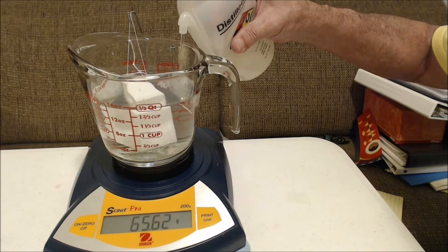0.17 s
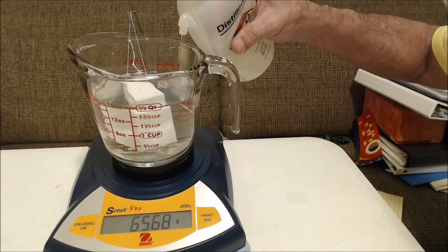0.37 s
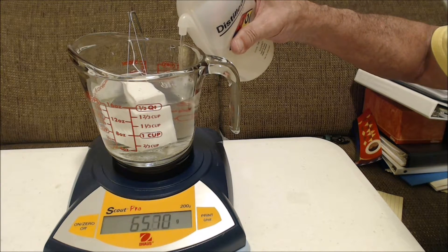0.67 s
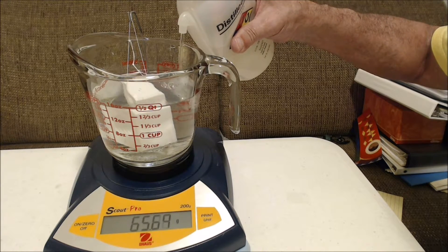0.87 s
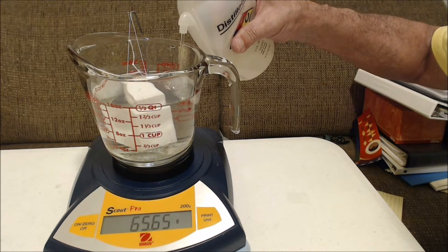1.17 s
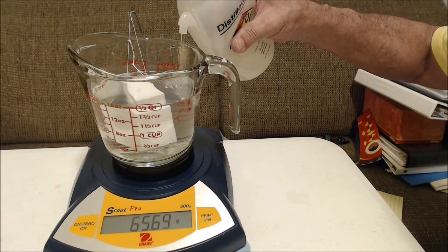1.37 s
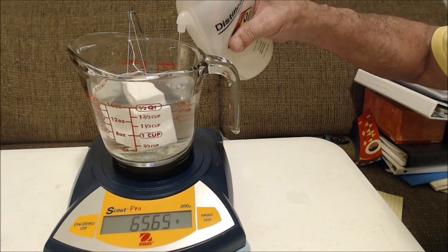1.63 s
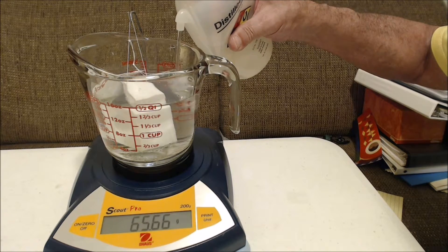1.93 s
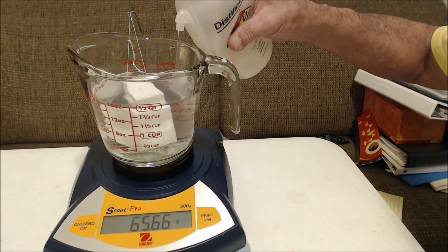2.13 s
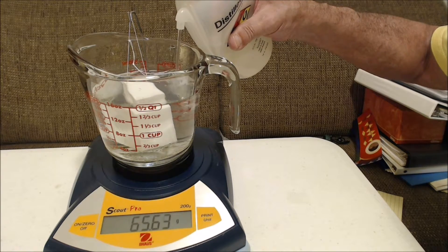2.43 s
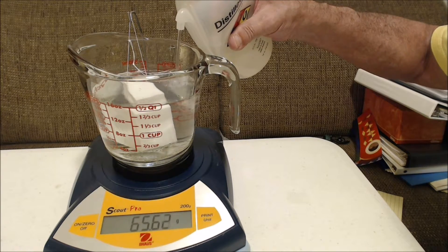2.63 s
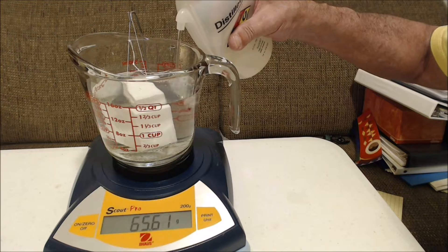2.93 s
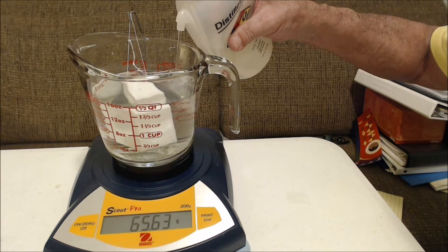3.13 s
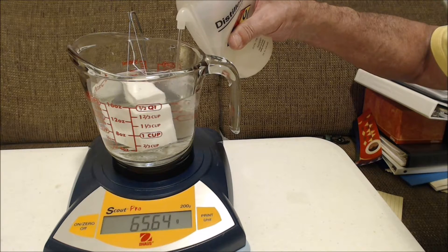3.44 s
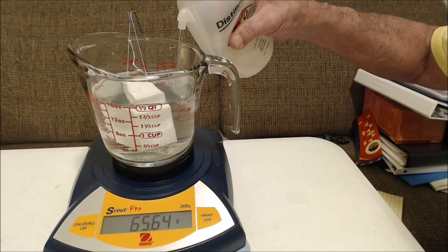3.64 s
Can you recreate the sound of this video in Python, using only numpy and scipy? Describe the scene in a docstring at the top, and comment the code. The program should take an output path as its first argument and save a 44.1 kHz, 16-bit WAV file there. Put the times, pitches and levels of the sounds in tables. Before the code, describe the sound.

Water trickles thinly from a jug into a partly filled glass cup, plopping and bubbling unevenly.

```python
"""Quiet room: a thin stream of water trickles from a jug into a partly filled glass cup.
Drops tick on the surface as impulses; trapped bubbles ring as short, dying, rising sines.
Band noise churns under them; resonances of the cup's air and glass colour all the water.
One soft low thud is a windowed cosine; the faint room hum is shaped noise.
"""
import sys
import numpy as np
from scipy import signal
from scipy.fft import rfft, irfft
from scipy.io import wavfile
from scipy.ndimage import uniform_filter1d

SR = 44100
rng = np.random.default_rng(int(sys.argv[2]) if len(sys.argv) > 2 else 0)


def file_out(sig):
    """Save sig as 16-bit WAV at sys.argv[1]."""
    # one column per channel
    cols = np.atleast_2d(sig).T
    # limit, then scale
    lim = np.clip(cols, -1, 1)
    pcm = np.round(lim * 32767).astype(np.int16)
    wavfile.write(sys.argv[1], SR, pcm)


N = 167580

# room hum spectrum, relative: freq_hz, density_db
HUM_SPECTRUM = [(25, -21.5), (70, -24.5), (100, -16), (125, 0.5), (150, -8), (195, 3.5), (260, -7),
                (400, -15), (700, -16), (2500, -23), (5000, -46), (8000, -58.5)]
# stream swells, one level per bubble size: start_s, hold_s, large_db, middle_db, fine_db
GUSHES = [(0.0, 0.0053, -43, -58, -57), (0.013, 0.15, -39.5, -49, -51), (0.296, 0.088, -54.5, -97, -64.5),
          (0.413, 0.19, -40.5, -54, -66), (0.584, 0.13, -42.5, -50.5, -56.5),
          (0.792, 0.043, -47.5, -76, -79), (0.849, 0.12, -43.5, -58, -61), (0.975, 0.15, -47, -62, -67),
          (1.159, 0.16, -35, -60.5, -63.5), (1.365, 0.16, -45.5, -55, -69.5),
          (1.551, 0.14, -44, -56.5, -55), (1.616, 0.14, -32.5, -46, -50.5),
          (1.781, 0.073, -26.5, -40.5, -46.5), (1.98, 0.081, -48.5, -50, -62.5),
          (2.038, 0.14, -35.5, -48, -66), (2.223, 0.12, -37.5, -70, -66), (2.379, 0.15, -60, -59, -71),
          (2.506, 0.087, -30.5, -57, -47.5), (2.633, 0.29, -44, -50.5, -60), (2.779, 0.17, -30, -37.5, -47),
          (3.015, 0.081, -43.5, -47.5, -59), (3.13, 0.094, -50, -55, -78), (3.199, 0.13, -41, -39, -59),
          (3.344, 0.14, -43.5, -49.5, -56), (3.412, 0.16, -45.5, -59, -61), (3.573, 0.078, -45.5, -42, -51),
          (3.688, 0.097, -31, -42.5, -55)]
# random bubble sizes: lowest_hz, highest_hz, rate_per_s, size_spread_db, gain_db
LARGE = (790.5, 1899.5, 300., -1.5, -6.5)
MIDDLE = (2248, 3905, 420, 1, -3.5)
FINE = (4095.5, 7701, 500., 3, -4)
# air resonances of the cup: freq_hz, width_hz, gain_db
CUP_AIR = [(869, 261, 1), (1344.4, 249, 4), (1829, 540, -6.5), (2477, 318, -1), (2900, 400, -18),
           (3530, 403, -5.5), (4204, 240, -20.5), (4714, 300, -1.5), (5527, 260, -11.5), (5963, 240, -15.5),
           (6565, 260, -14.5), (7445, 327, -20.5)]
# ringing modes of the glass: freq_hz, gain_db, t60_s
GLASS_MODES = [(817.5, 6, 0.096), (890.5, 6, 0.27), (1210.1, 3.5, 0.2), (1280, 2.5, 0.11),
               (1406, -7.5, .18), (1514, -3, 0.26), (1552, 5.5, 0.19), (1964, -11.5, 0.14),
               (2402, 3.5, 0.3), (2499, 6, 0.25), (2602, 7.5, 0.2), (4640, -8, 0.11), (5440, 4, 0.22)]
# near echoes of the room: delay_s, gain_db
ECHOES = [(.0105, -11.), (.019, -15.)]
# clearest bubbles, peak as after the cup air: start_s, peak_db, pitch_hz
BUBBLES = [(0.046, -33.5, 869), (0.118, -36, 793), (0.155, -32.5, 810), (0.332, -37.5, 844),
           (0.68, -33.5, 910), (0.947, -36.5, 793), (1.031, -39, 815), (1.204, -27.5, 820),
           (1.281, -51, 905), (1.571, -44, 797), (1.625, -24.5, 857), (1.649, -20, 859),
           (1.731, -27.5, 839), (1.8, -24.5, 912), (1.808, -20.5, 1034), (1.82, -26.5, 1005),
           (1.85, -24.5, 987), (1.87, -36, 821), (2.049, -27.5, 960), (2.1, -24, 870), (2.295, -24.5, 843),
           (2.542, -27.5, 883), (2.628, -35, 764), (2.811, -19.5, 905), (3.139, -36.5, 791),
           (3.363, -29, 812), (3.722, -31.5, 800), (0.1171, -27, 1314), (0.186, -21, 1646),
           (0.2887, -26.5, 1438), (0.3321, -35.5, 1870), (0.4444, -31.5, 1437), (0.5147, -27.5, 1184),
           (0.5285, -32.5, 1224), (0.6804, -24, 1377), (0.7487, -35, 1420), (0.9462, -29, 1314),
           (1.2047, -23.5, 1330), (1.5095, -32, 1320), (1.6247, -21.5, 1460), (1.6362, -19.5, 1440),
           (1.6846, -25, 1630), (1.697, -16, 1463), (1.725, -40.5, 1366), (2.0492, -9, 1380),
           (2.0896, -16, 1222), (2.1036, -12, 1246), (2.1365, -23.5, 1296), (2.2722, -37, 1970),
           (2.2947, -27.5, 1913), (2.363, -36.5, 1890), (2.3945, -27.5, 1332), (2.4074, -29.5, 1404),
           (2.4518, -29.5, 1480), (2.5117, -23.5, 1452), (2.5414, -23, 1246), (2.6868, -27.5, 1168),
           (2.821, -12, 1418), (2.8444, -11, 1580), (2.9113, -20, 1453), (3.057, -24.5, 1610),
           (3.1228, -30, 1367), (3.1393, -21.5, 1230), (3.2131, -23, 1264), (3.2909, -24, 1533),
           (3.3628, -19.5, 1253), (3.4266, -26, 1175), (3.466, -24, 1180), (3.5069, -20, 1263),
           (3.6002, -28.5, 1450), (3.7254, -6.5, 1223), (0.1845, -35, 2453), (0.214, -34, 2450),
           (0.5975, -28.5, 2480), (0.8604, -34.5, 2610), (1.0061, -27, 2395), (1.1024, -32, 2434),
           (1.6252, -21, 2684), (1.7, -27, 2310), (2.0014, -29.5, 2375), (2.1355, -37, 2390),
           (2.15, -25, 2438), (2.5182, -30.5, 2410), (2.6798, -33, 2540), (2.9043, -33, 2380),
           (3.234, -25, 2750), (3.2909, -38.5, 2620), (3.3233, -23.5, 2870), (3.4266, -31.5, 2800),
           (3.5583, -33, 2485), (3.7234, -31, 2290), (3.7544, -21, 2600), (0.0243, -31, 3810),
           (0.0677, -32.5, 4560), (0.156, -28, 4740), (0.185, -22.5, 6100), (0.4334, -37.5, 6070),
           (0.5437, -33.5, 4830), (0.5985, -38, 3460), (0.9093, -33.5, 4870), (1.071, -38, 4760),
           (1.3848, -38, 4900), (1.4511, -33, 3580), (1.6247, -25.5, 4730), (1.697, -26.5, 4280),
           (1.8068, -29, 7600), (1.8357, -26, 4320), (1.8647, -28.5, 6950), (2.0014, -35, 4550),
           (1.166, -41, 3700), (2.151, -24.5, 3120), (2.168, -36, 3540), (2.2334, -37.5, 3220),
           (2.2913, -37, 4790), (2.3078, -31.5, 5620), (2.4518, -27, 4940), (2.5177, -29, 4160),
           (2.796, -34, 4500), (2.8779, -22, 4910), (3.0579, -25, 4340), (3.2046, -33, 4640),
           (3.2535, -37, 3410), (3.2804, -31, 3570), (3.7239, -32.5, 4790)]
# sharp surface splashes, peak before glass and room: start_s, peak_db
TICKS = [(.0835, -35), (.1005, -40), (.1565, -19), (.1715, -32), (.1855, -25.5), (.2265, -36.5),
         (1.6245, -29), (1.697, -35), (1.763, -32), (1.7995, -40), (1.8075, -36), (1.865, -32),
         (1.9725, -44), (2.048, -38), (2.308, -48.5)]
# low knock: centre_s, peak_db, pitch_hz, half_length_s, echo_delay_s, echo_db
THUD = (2.7533, -16.5, 300., .0017, .0122, -14.)

HUM_DB, HUM_SWELL_DB = -64, 3.5
GUSH_RISE_S, GUSH_FALL_S = 0.019, 0.0075
LULL_DB = -21  # against the median gush
WASH_DB = -14  # churning water, against the gush level
PATCH_DB = 8.5  # colour shift, in patches of about 400 Hz by 40 ms
OPEN_DB = -45  # direct path past the air resonances
RING_CYCLES, RING_S = 9.5, .0012  # ring length: a few cycles plus a fixed time
RISE_SHARE = 0.093  # soft start as share of the ring
CLEAR_GLIDE_MEAN, STREAM_GLIDE_MAX = 0.039, 0.04  # pitch gain over the ring, as a share
CLUMP_S, CLUMP_DB = .06, 4  # bubbles of like size come in clumps
LARGEST_DB = 9  # cap on a random bubble's size, before scaling
WAVER_SHARE, WAVER_S = 0.0052, 0.018  # moving water bends each glass mode
ROOM_DB, ROOM_T60_S, ROOM_DULL_HZ = -14.5, 0.1, 2760
CRACKLE_PER_S, CRACKLE_SPREAD_DB, CRACKLE_DB = 150, 5, -11  # level against the fine gushes
THUD_ROOM_SHARE = .3  # share of the thud that passes through the room
MIC_HZ, EDGE_HZ, HISS_DB = 7850, 15750, -90


def amp(db):
    """Amplitude ratio of a level in dB."""
    return 10 ** (np.asarray(db) / 20)


def evened(x):
    """Scale to unit RMS."""
    return x / np.sqrt(np.mean(x ** 2) + 1e-20)


def smooth_twice(x, size):
    """Two running means."""
    return uniform_filter1d(uniform_filter1d(x, size), size)


def add(mix, start_s, sound):
    """Add a sound in place, cut at the end of the mix."""
    part = mix[round(start_s * SR):][:len(sound)]
    part += sound[:len(part)]


def lowpass(x, hz, size):
    """Linear-phase FIR low-pass, delay removed."""
    taps = signal.firwin(size, hz, window=("kaiser", 8), fs=SR)
    return signal.oaconvolve(x, taps[None], "same")


def hum():
    """Low noise of the room, shaped in frequency and swelling a little."""
    table_hz, table_db = np.transpose(HUM_SPECTRUM)
    hz = np.fft.rfftfreq(N, 1 / SR)
    colour = amp(np.interp(np.log(hz + 1), np.log(table_hz + 1), table_db))
    noise = irfft(rfft(rng.standard_normal(N)) * colour, N)
    swell = evened(smooth_twice(rng.standard_normal(N), 6000))
    return amp(HUM_DB + HUM_SWELL_DB * swell) * evened(noise)


def gushes(column, t):
    """Stream amplitude for one bubble size: quick swells that hold and die away over a lull."""
    table = np.transpose(GUSHES)[:, :, None]
    start_s, hold_s, level_db = table[0], table[1], table[column]
    u = t - start_s
    rise = np.clip(u / GUSH_RISE_S + .5, 0, 1) ** 2
    fall = np.exp(-np.maximum(u - hold_s, 0) / GUSH_FALL_S)
    swell = amp(level_db) * rise * fall
    return amp(LULL_DB + np.median(level_db)) + swell.sum(0)


def cup():
    """Impulse response of the air in the cup: broad damped resonances plus a direct path."""
    t = np.arange(SR // 20) / SR
    air = np.zeros(len(t))
    for k, (hz, width_hz, db) in enumerate(CUP_AIR):
        decay = np.pi * width_hz
        envelope = 2 * decay ** 2 * t / SR * np.exp(-decay * t)
        air += amp(db) * envelope * np.cos(2 * np.pi * hz * t + k * np.pi)  # alternating sign
    air[0] += amp(OPEN_DB)
    return air


def wash(body, column, lo_hz, hi_hz):
    """Churning: band noise of one bubble size, in patches of colour, through the cup."""
    band = signal.butter(2, [lo_hz, hi_hz], "band", fs=SR, output="sos")
    z = signal.stft(signal.sosfilt(band, rng.standard_normal(N)), nperseg=512)[2]
    patches = uniform_filter1d(rng.standard_normal(z.T.shape), size=7, axis=0)  # time
    patches = evened(uniform_filter1d(patches, size=5, axis=1))  # frequency
    noise = signal.istft(z * amp(PATCH_DB * patches.T.clip(-3, 2)), nperseg=512)[1]
    noise = evened(signal.fftconvolve(noise, body)[:N])
    t = np.arange(0, N, 64) / SR
    level = np.interp(np.arange(N) / SR, t, gushes(column, t))
    return amp(WASH_DB) * noise * level


def bubble(hz, cycles, glide):
    """A dying sine whose pitch climbs as the bubble nears the surface; peak 1."""
    cycles = max(cycles, 1)
    u = np.arange(0, 5 * cycles / hz, 1 / SR) * hz  # time in starting cycles
    rise = (1 - np.exp(-u / (RISE_SHARE * cycles))) ** 2
    decay = np.exp(-u / cycles * 2)
    tone = rise * decay * np.sin(2 * np.pi * (u + glide * u ** 2 / (2 * cycles)))
    return tone / abs(tone).max()


def small_bubbles(body, column, lo_hz, hi_hz, rate, spread_db, gain_db, count=24, size=3000):
    """Random bubbles of many pitches, in clumps, following the gushes."""
    wait, luck, sort = rng.random((size, 3)).T
    t = np.cumsum(-np.log(wait)) / rate
    kind = (sort * count).astype(int)
    clumps = evened(uniform_filter1d(rng.standard_normal((size, count)), size=4, axis=1))
    clump_db = CLUMP_DB * clumps[(t / CLUMP_S).astype(int) % size, kind]
    size_db = -spread_db * np.log(luck) + clump_db
    strength = amp(np.minimum(size_db, LARGEST_DB))
    tones = []
    for hz, (a, b) in zip(np.geomspace(lo_hz, hi_hz, count), rng.random((count, 2))):
        cycles = (RING_CYCLES + RING_S * hz) * (0.36 + 1.67 * a)
        tones.append(bubble(hz, cycles, STREAM_GLIDE_MAX * b))
    # level set by the power expected after the cup
    colour = rfft(body, 2 ** 14)
    energy = np.mean([np.mean(abs(rfft(tone, 2 ** 14) * colour) ** 2) for tone in tones])
    rms = np.sqrt(np.mean(strength ** 2) * energy * rate / SR)
    strength = strength * gushes(column, t) * amp(gain_db) / rms
    out = np.zeros(N)
    for start_s, k, a in zip(t[t < N / SR], kind, strength):
        add(out, start_s, a * tones[k])
    return out


def glass(x):
    """Longer modes of the glass, each wavering in pitch as the water moves, added to x."""
    out, span = x.copy(), round(WAVER_S * SR)
    for hz, db, t60_s in GLASS_MODES:
        waver = evened(smooth_twice(rng.standard_normal(N), span))
        turn = np.exp(2j * np.pi * np.cumsum(hz * (1 + WAVER_SHARE * waver)) / SR)
        r = amp(-60 / t60_s / SR)
        # shift the mode to 0 Hz, one-pole ring, shift back
        ring = signal.lfilter([1 - r], [1, -r], x / turn + 1e-18)
        out += 2 * amp(db) * (turn * ring).imag
    return out


def room(x):
    """A few near echoes and a short, dulled tail of sparse random taps."""
    taps = np.zeros(SR // 2)
    at = np.arange(300, SR // 2 - 20, 20)
    at = at + rng.integers(0, 20, len(at))
    taps[at] = rng.choice([-1., 1.], len(at)) * amp(-60 * at / SR / ROOM_T60_S)
    taps = signal.lfilter(*signal.butter(1, ROOM_DULL_HZ, fs=SR), taps)
    taps *= amp(ROOM_DB) / np.linalg.norm(taps)
    taps[0] = 1  # direct sound
    for delay_s, db in ECHOES:
        add(taps, delay_s, amp(db) * np.hanning(7) / 3)
    return signal.fftconvolve(x, taps)[:N]


def clear_bubbles(body):
    """Each listed bubble, scaled so that it reaches its peak after the cup."""
    out = np.zeros(N)
    for (start_s, db, hz), chance in zip(BUBBLES, rng.random(len(BUBBLES))):
        tone = bubble(hz, RING_CYCLES + RING_S * hz, CLEAR_GLIDE_MEAN * 2 * chance)
        heard = abs(signal.fftconvolve(tone, body[:1000])).max()
        add(out, start_s, tone * amp(db) / heard)
    return out


def splashes(body):
    """Sharp wide ticks: the listed ones, and a random crackle that follows the fine gushes."""
    tick = np.diff(body, 2)  # cup response, tilted to the treble
    hit, luck = rng.random((N, 2)).T
    sizes = amp(-CRACKLE_SPREAD_DB * np.log(luck).clip(-3))
    signs = np.sign(luck % .02 - .01)
    crackle = evened((hit < CRACKLE_PER_S / SR) * sizes * signs)
    out = crackle * amp(CRACKLE_DB) * gushes(4, np.arange(N) / SR) / np.linalg.norm(tick)
    for start_s, db in TICKS:
        out[round(start_s * SR)] += amp(db) / abs(tick).max()
    return signal.fftconvolve(out, tick)[:N]


def thud():
    """A soft low knock, a cosine under a Gaussian, and its one echo."""
    centre_s, db, hz, half_length_s, delay_s, echo_db = THUD
    t, out = np.arange(-400, 400) / SR, np.zeros(N)
    knock = amp(db) * np.exp(-.5 * (t / half_length_s) ** 2) * np.cos(2 * np.pi * hz * t)
    add(out, centre_s + t[0], knock)
    add(out, centre_s + t[0] + delay_s, knock * amp(echo_db))
    return out


def scene():
    """Water through cup, glass and room, with thud and hum."""
    body = cup()
    sizes = list(enumerate((LARGE, MIDDLE, FINE), 2))  # columns of GUSHES
    bubbles = clear_bubbles(body)
    bubbles = bubbles + sum(small_bubbles(body, column, *size) for column, size in sizes)
    churn = sum(wash(body, column, *size[:2]) for column, size in sizes)
    water = signal.fftconvolve(bubbles, body)[:N] + churn + splashes(body)
    knock = thud()
    wet = room(glass(water) + THUD_ROOM_SHARE * knock)
    return (wet + (1 - THUD_ROOM_SHARE) * knock + hum())[None]


def record(dry):
    """A narrow-band microphone, faint hiss, then the band limit."""
    heard = lowpass(dry, MIC_HZ, size=201)
    hiss = amp(HISS_DB) * rng.standard_normal(dry.shape)
    return lowpass(heard + hiss, EDGE_HZ, size=401)


dry = scene()
out = record(dry)
file_out(out)
```